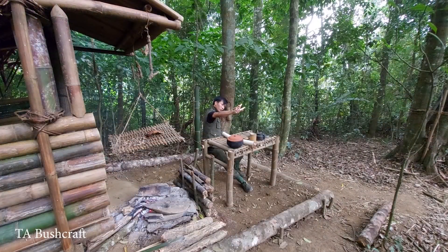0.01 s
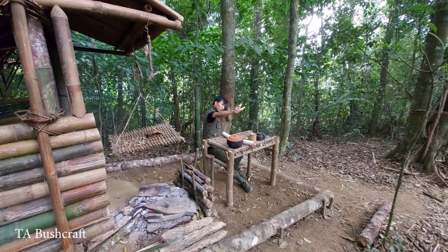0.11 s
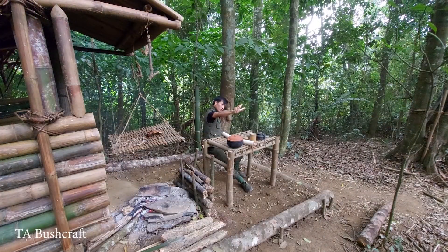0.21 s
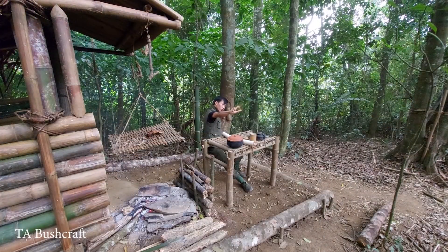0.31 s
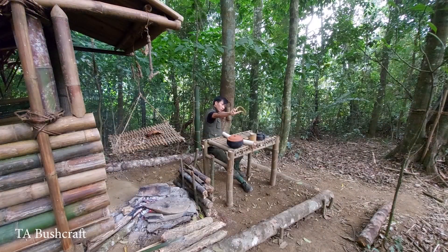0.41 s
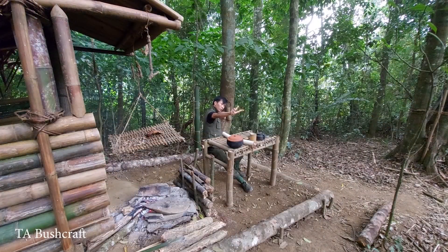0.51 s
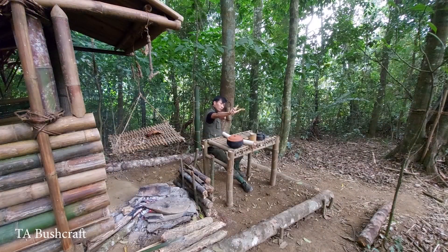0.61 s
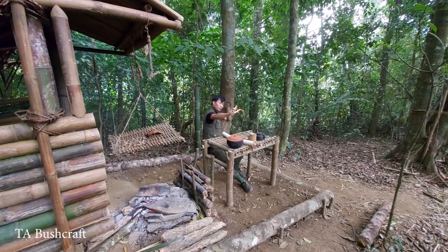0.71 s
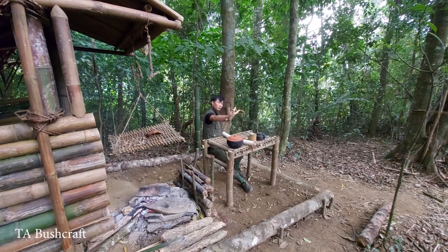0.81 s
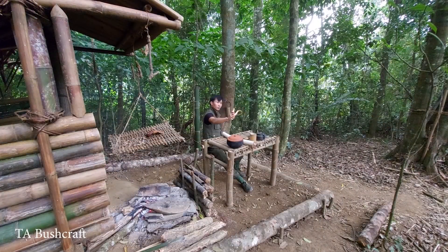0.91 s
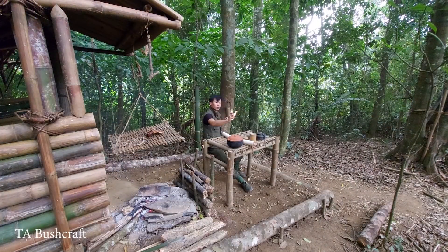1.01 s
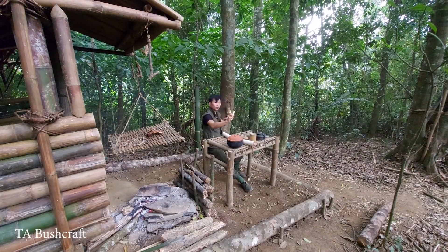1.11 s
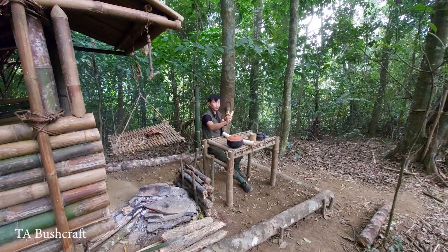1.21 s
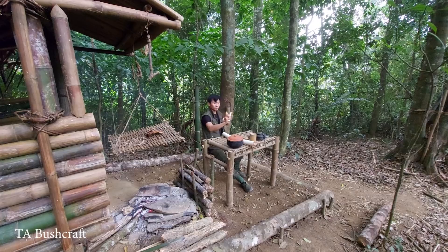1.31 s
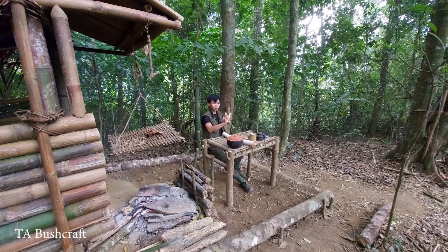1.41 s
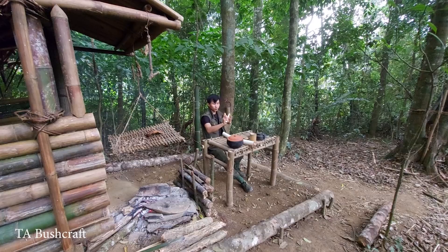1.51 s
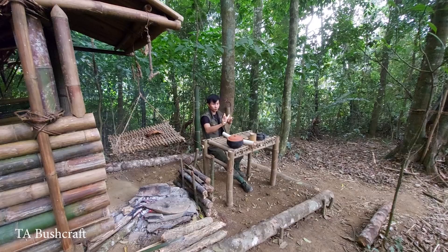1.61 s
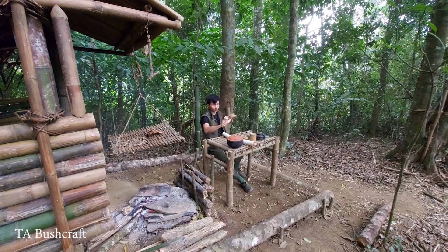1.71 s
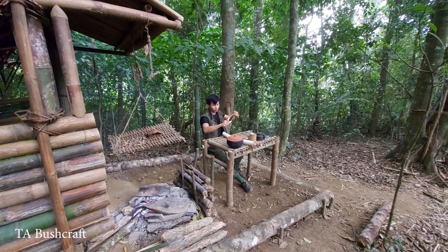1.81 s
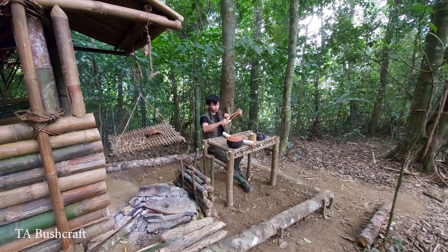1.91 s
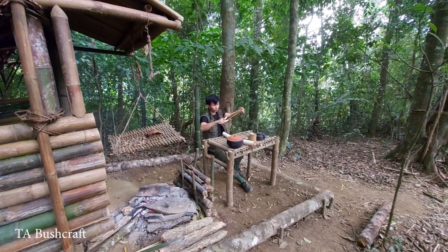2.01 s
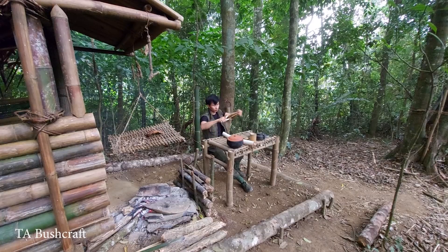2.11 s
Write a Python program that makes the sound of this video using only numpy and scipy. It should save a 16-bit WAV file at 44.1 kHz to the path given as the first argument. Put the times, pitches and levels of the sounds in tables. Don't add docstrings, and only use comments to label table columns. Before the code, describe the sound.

A slingshot fires almost at once: a very brief whip, a loud, overloaded crack and small thump, then a short bright scatter off trunks. Steady high insects drone, a distant bird hoots, faint metallic tinks follow.

```python
import sys
import numpy as np
from scipy import signal
from scipy.fft import rfft, irfft, next_fast_len
from scipy.io import wavfile
from scipy.ndimage import map_coordinates

SR = 44100
rng = np.random.default_rng(int(sys.argv[2]) if len(sys.argv) > 2 else 0)


def unload_wav(signal):
    wavfile.write(
        sys.argv[1],
        SR,
        np.round(np.clip(np.atleast_2d(signal).T, -1, 1) * 32767).astype(np.int16),
    )


def to_linear_factor(level_db):
    exponent = np.asarray(level_db, float) / 20
    return 10 ** exponent


N = 97020

# f/Hz, level/dB per Hz
CHORUS_SPECTRUM = [(2350, -45.5), (4000, -15.5), (4470, -10.5), (4690, -6.5), (4820, -6.5), (4970, 2.5),
                   (5220, 0), (5750, -11.5), (6200, -18.5), (8060, -51), (13600, -120)]
AIR_SPECTRUM = [(18, -42), (30, -11.5), (128, -0.5), (193, -9), (322, -5.5), (549, -11), (861, -14.5),
                (4000, -23.5), (5200, -50.5), (8800, -120)]
HISS_SPECTRUM = [(6200, -9), (7200, -13.5), (7800, -5), (9500, -2.5), (11000, 0), (13000, -1),
                 (15900, -5.5)]
# t/s, level/dB
CHORUS_SWELL = [(0, -67.5), (.4, -67), (.8, -68), (1.2, -70), (1.6, -68), (1.9, -68), (2.2, -67.5)]

# t/s, level/dB
HOOT_CALLS = [
    (.116, 2),
    (.768, 2),
    (1.413, 2),
    (2.073, 1),
]
# t after its start/s, length/s, f/Hz, downward glide/Hz, level/dB
HOOT_NOTES = [
    (0, .036, 770, 110, -62.5),
    (0.073, .046, 776.5, 230.3, -56),
    (.148, .052, 799.5, 210, -56),
]
# f/Hz, level/dB
HOOT_ECHO_COLOUR = [(700, -5), (790, -3), (860, 8), (950, 12), (1100, 6)]

RELEASE_S, CRACK_S = 0.2383, 0.2462
# f/Hz, level/dB, t60/s
FLUTTER_MODES = [(770, 0, .022), (1120, -8, .02), (318.4, -3, .04), (620, -4.5, .018), (906, -9, 0.02),
                 (450, -9.5, 0.03)]
# f/Hz, level/dB per Hz
CRACK_SPECTRUM = [(1200, -8), (1800, -14.5), (2700, -3), (3400, -9), (5800, -3), (7500, -10.5),
                  (11000, -0.5), (15900, -5)]
# f/Hz, correlation/1
CRACK_CORRELATION = [(60, 1.), (950, 1), (3800, 0.16), (8000, .2), (15000, -0.95)]
# t/s, level under the crack/dB
POUCH_SLAPS = [
    (0.2482, -6),
    (0.2576, -8),
    (0.2606, -7),
]
# t/s, f/Hz, level/dB, t60/s
POUCH_PINGS = [
    (.2464, 11080, -6.5, 0.0066),
    (0.248, 5830, -4.5, 0.012),
    (0.2476, 2704, -9, 0.039),
]

# f/Hz, level/dB per Hz
TAIL_SPECTRUM = [(60, -10.5), (840, -8.5), (1500, -13), (2700, -11.5), (5000, -6.5), (7400, -12),
                 (10500, -0.5), (15900, -6.5)]
# f/Hz, correlation/1
TAIL_CORRELATION = [(60, .9), (200, 0.69), (550, .5), (1650, -0.16), (5000, -.1), (15000, 0)]
# f/Hz, t60/s
TRUNK_DECAY = [(80, .18), (400, .25), (1000, 0.28), (2500, .33), (4500, .38), (7500, .36), (10500, .34),
               (16000, 0.36)]
# f/Hz, level/dB
FAR_TRUNK_SHARE = [(600, -22), (1500, -24), (3000, -19.5), (4500, -13.5), (7500, -12), (10500, -15),
                   (14000, -25)]

# t/s, high mode/dB, low mode/dB, middle mode/dB, rustle/dB
PELLET_STRIKES = [
    (1.565, -68, -65.5, -90, -59),
    (1.964, -65.5, -90, -74, -71),
    (2.195, -54, -90, -80, -76),
]
# f/Hz, beat f/Hz, t60/s, blur width/Hz
STEEL_MODES = [
    (9750, 31, .55, 150),
    (3750, 30, .3, 350),
    (7200, 20, .05, 400),
]
# f/Hz, level/dB per Hz
RUSTLE_SPECTRUM = [(2500, -22), (5500, -8), (8000, -4), (11000, -2), (14500, 1), (15900, 0)]
# t/s, level/dB, f/Hz
PELLET_TICKS = [
    (.586, -55, 14200),
    (.737, -60, 10500),
    (1.411, -51, 10700),
    (1.565, -55, 11000),
    (1.699, -57, 11500),
]

# f/Hz, level/dB per Hz
RASP_SPECTRUM = [(5000, -34), (5500, -9), (6100, -6.5), (6700, -3.5), (7000, -9), (7200, -36)]
LOW_RASP_SPECTRUM = [(2100, -13), (2500, -4), (2900, -15)]


def unit(x):
    return x / np.sqrt(np.mean(x ** 2) + 1e-20)


def along(points, hz):
    f, value = np.transpose(points)
    return np.interp(np.log(hz + 1), np.log(f + 1), value)


def since(start_s):
    t = np.arange(N) / SR - start_s
    return np.abs(t), t >= 0


def dying(start_s, t60):
    t, on = since(start_s)
    return on * to_linear_factor(-60 * t / t60)


def filtered(x, response):
    m = next_fast_len(N + 8192)
    return irfft(rfft(x, m) * response(np.fft.rfftfreq(m, 1 / SR)), m)[..., :N]


def rush(spectrum, correlation=((100, 0),)):
    def response(hz):
        inside = (hz >= spectrum[0][0]) & (hz <= spectrum[-1][0])
        angle = np.arccos(np.clip(along(correlation, hz), -1, 1)) / 2
        return to_linear_factor(along(spectrum, hz)) * inside * np.array([np.cos(angle), np.sin(angle)])

    mid, side = filtered(rng.standard_normal((2, N)), response)
    return unit(np.array([mid + side, mid - side]))


def narrow(hz, width_hz):
    return unit(filtered(rng.standard_normal((2, N)), lambda f: 1 / (1 + (2 * (f - hz) / width_hz) ** 2)))


def wobble(rate_hz):
    knots = rng.standard_normal(int(N * rate_hz / SR) + 4)
    return map_coordinates(knots, [np.arange(N) * rate_hz / SR])


def shaped(x, gain):
    hz, t, z = signal.stft(x, SR, nperseg=256)
    return signal.istft(z * gain(hz[:, None], t[None]), SR, nperseg=256)[1][..., :N]


def forest():
    swell_s, swell_db = np.transpose(CHORUS_SWELL)
    wing_hz = 105.6 * (1 + 0.055 * wobble(7.8))
    wings = 1 + 0.3 * np.sin(2 * np.pi * np.cumsum(wing_hz) / SR)
    chorus_db = 4.5 + np.interp(np.arange(N) / SR, swell_s, swell_db) + 0.62 * wobble(6.7)
    chorus = to_linear_factor(chorus_db) * wings * rush(CHORUS_SPECTRUM)
    air = to_linear_factor(-67 + 0.6 * wobble(5)) * rush(AIR_SPECTRUM)
    hiss = to_linear_factor(-66 + 0.45 * wobble(3)) * rush(HISS_SPECTRUM)
    return chorus + air + hiss


def bird():
    glide_s, echo_db, echo_t60, pan_db = 0.007, -3, 0.7, 2
    calls = np.zeros(N + SR)
    for call_s, call_db in HOOT_CALLS:
        for after_s, length_s, hz, drop_hz, db in HOOT_NOTES:
            t = np.arange(round(length_s * SR)) / SR
            phase = 2 * np.pi * np.cumsum(hz + drop_hz * np.exp(-t / glide_s)) / SR
            swell = np.sin(np.pi * (t / length_s) ** 1.2) ** 1.1
            first = round((call_s + after_s) * SR)
            calls[first:][:len(t)] += to_linear_factor(db + call_db) * swell * np.sin(phase)
    calls = calls[:N]
    late = np.arange(SR // 2) / SR
    echo = rng.standard_normal((2, SR // 2)) * to_linear_factor(-60 * late / echo_t60) * (late > 0.015)
    echo /= np.linalg.norm(echo[0])
    coloured = filtered(calls[None], lambda f: to_linear_factor(along(HOOT_ECHO_COLOUR, f)))
    wet = signal.fftconvolve(coloured, echo, axes=1)[:, :N]
    return (calls + to_linear_factor(echo_db) * wet) * to_linear_factor([[pan_db], [-pan_db]])


def whip():
    rise_db, swish_rise_s = 28.5, 0.004
    t = np.arange(N) / SR - CRACK_S
    gone, released = since(RELEASE_S)
    swell = released * to_linear_factor(rise_db * np.minimum(t, 0) / (CRACK_S - RELEASE_S))
    peak = t - 0.002
    flutter = 0
    for hz, db, t60 in FLUTTER_MODES:
        flutter += to_linear_factor(db - 60 * np.maximum(peak, 0) / t60) * np.cos(2 * np.pi * hz * peak)
    swish_db = -22.5 + 24 * np.minimum(gone / swish_rise_s - 1, 0)
    swish = released * (t < 0) * to_linear_factor(swish_db) * rush(CRACK_SPECTRUM, CRACK_CORRELATION)
    return to_linear_factor(-13) * swell * flutter + swish


def crack():
    hold_s, t60 = 0.002, 0.03
    t, on = since(CRACK_S)
    burst = on * to_linear_factor(-60 * np.maximum(t - hold_s, 0) / t60)
    for slap_s, db in POUCH_SLAPS:
        burst += to_linear_factor(db) * dying(slap_s, 0.012)
    out = to_linear_factor(-3.5) * burst * rush(CRACK_SPECTRUM, CRACK_CORRELATION)
    for ping_s, hz, db, ping_t60 in POUCH_PINGS:
        t = since(ping_s)[0]
        onset = 1 - np.exp(-t / 0.0004)
        out += to_linear_factor(db) * dying(ping_s, ping_t60) * np.sin(2 * np.pi * hz * t) * onset
    return out


def thump():
    start_s, thump_db, hz, t60, cut_hz = 0.2476, -9, 95, 0.045, 48
    t = since(start_s)[0]
    onset = 1 - np.exp(-t / 0.00068)
    push = to_linear_factor(thump_db) * dying(start_s, t60) * np.sin(2 * np.pi * hz * t - 0.2) * onset
    return filtered(push, lambda f: -f * f / (cut_hz ** 2 - f * f + 1.2j * f * cut_hz))


def trunks():
    far_slower, rise_s = 1.9, 0.0027
    t, on = since(CRACK_S)

    def decay(hz, s):
        fall_db = -60 * np.maximum(s - CRACK_S, 0) / along(TRUNK_DECAY, hz)
        far = to_linear_factor(along(FAR_TRUNK_SHARE, hz) + fall_db / far_slower)
        return np.hypot(to_linear_factor(fall_db), far)

    tail = to_linear_factor(-10) * shaped(rush(TAIL_SPECTRUM, TAIL_CORRELATION), decay)
    pouch_note = to_linear_factor(-24 - 60 * t / 0.45) * narrow(2700, 320)
    return on * (1 - np.exp(-t / rise_s)) * (tail + pouch_note)


def pellets():
    blur_db, rustle_t60, tick_t60 = -4, 0.45, 0.012
    out, rustle = np.zeros((2, N)), rush(RUSTLE_SPECTRUM)
    blurs = [narrow(hz, width_hz) for hz, _, _, width_hz in STEEL_MODES]
    for strike_s, *levels, rustle_db in PELLET_STRIKES:
        t = since(strike_s)[0]
        for db, (hz, beat_hz, t60, _), blur in zip(levels, STEEL_MODES, blurs):
            upper = np.sin(2 * np.pi * (hz + beat_hz) * t - [[1.2], [1.7]])
            pair = np.sin(2 * np.pi * hz * t) + upper
            beat = 1 - 0.59 * np.sin(2 * np.pi * beat_hz * t - 3)
            out += to_linear_factor(db) * dying(strike_s, t60) * (pair + to_linear_factor(blur_db) * beat * blur)
        out += to_linear_factor(rustle_db) * dying(strike_s, rustle_t60) * rustle
    for tick_s, db, hz in PELLET_TICKS:
        tick = rush([(0.82 * hz, -14), (hz, 0), (1.18 * hz, -14)])
        out += to_linear_factor(db) * dying(tick_s, tick_t60) * tick
    return out


def buzzer():
    start_s, hold_s, t60, pulse_hz, climb_hz_per_s = 1.385, 0.18, 0.792, 240, 65000
    t, on = since(start_s)
    edge_hz = RASP_SPECTRUM[1][0]
    rasp = shaped(rush(RASP_SPECTRUM), lambda hz, s: hz < edge_hz + climb_hz_per_s * (s - start_s))
    pulses = 1 + 0.5 * np.sin(2 * np.pi * pulse_hz * t + 1.6 * wobble(29.94))
    fade = on * to_linear_factor(-61.5 - 60 * np.maximum(t - hold_s, 0) / t60)
    return fade * (pulses * rasp + to_linear_factor(-17) * rush(LOW_RASP_SPECTRUM))


def scene():
    slingshot = whip() + crack() + thump()
    return forest() + bird() + slingshot + trunks() + pellets() + buzzer()


def low_pass(x):
    return signal.sosfilt(signal.butter(12, 16090, fs=SR, output="sos"), x)


def record(dry):
    top, knee = 1.0, 14
    mix = dry / (1 + np.abs(dry / top) ** knee) ** (1 / knee)
    return low_pass(mix)


dry = scene()
out = record(dry)
unload_wav(out)
```